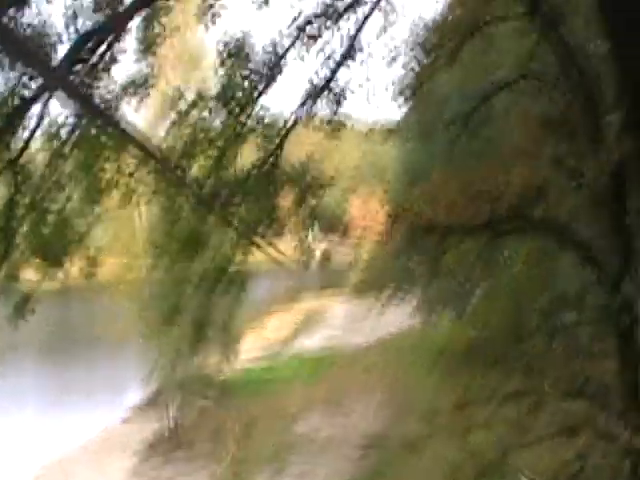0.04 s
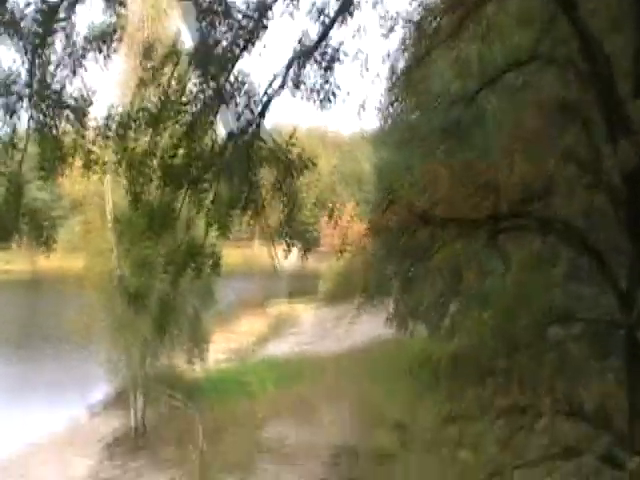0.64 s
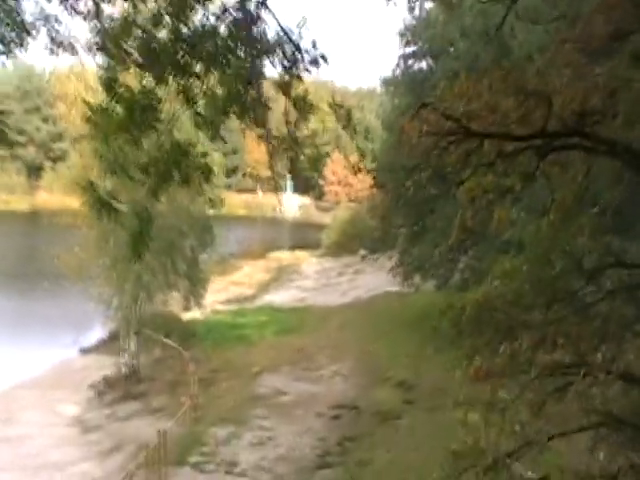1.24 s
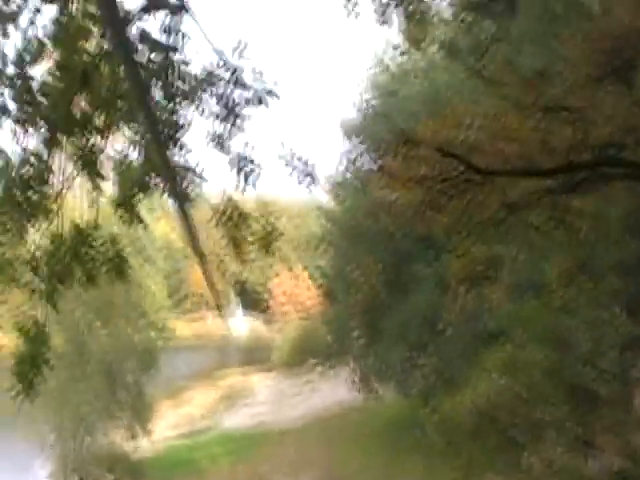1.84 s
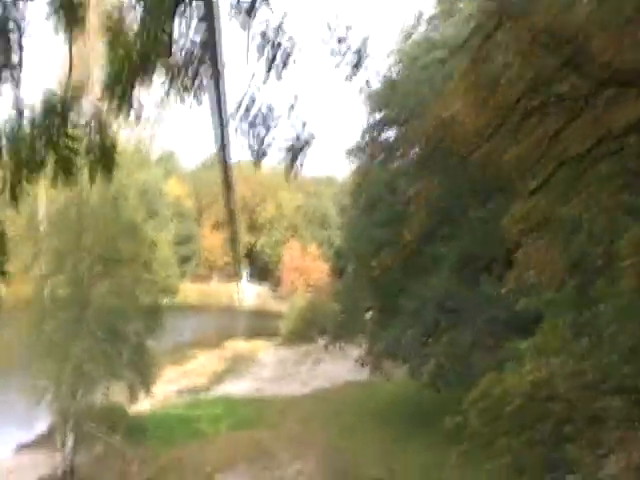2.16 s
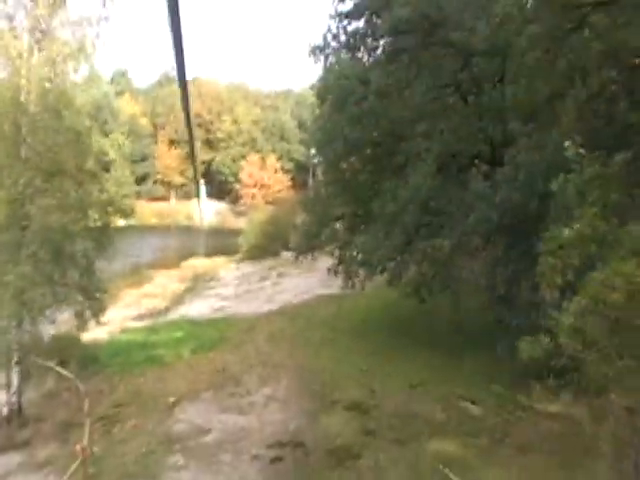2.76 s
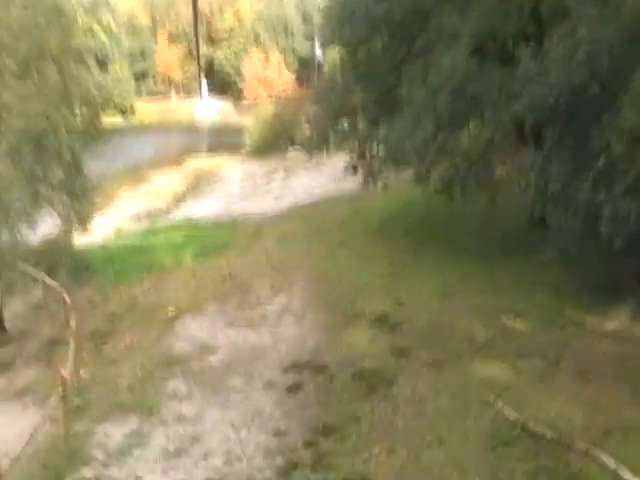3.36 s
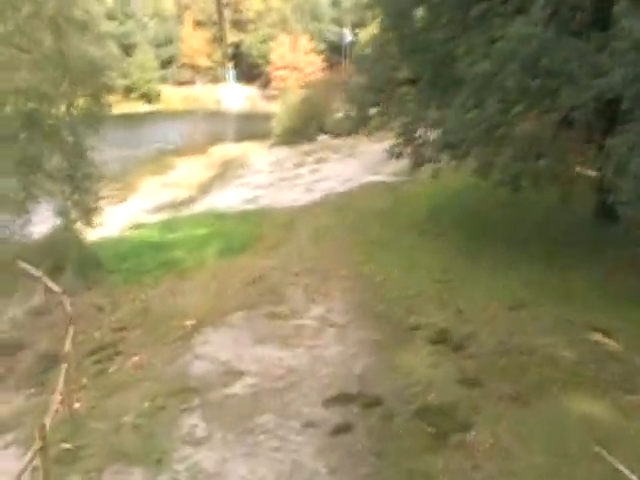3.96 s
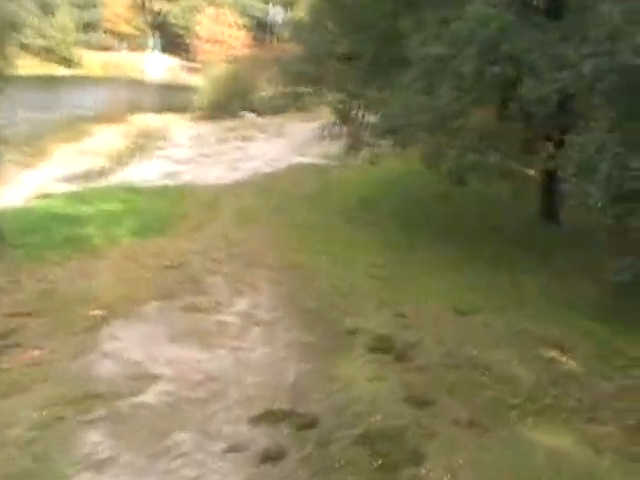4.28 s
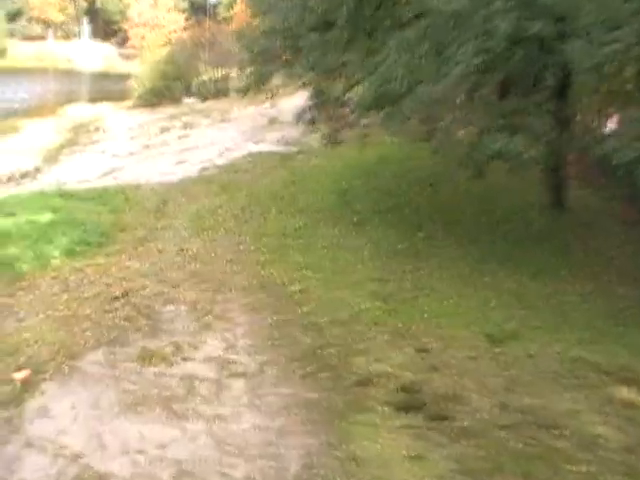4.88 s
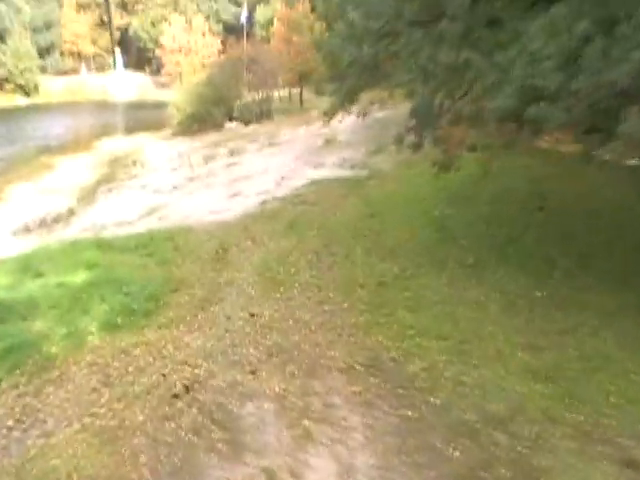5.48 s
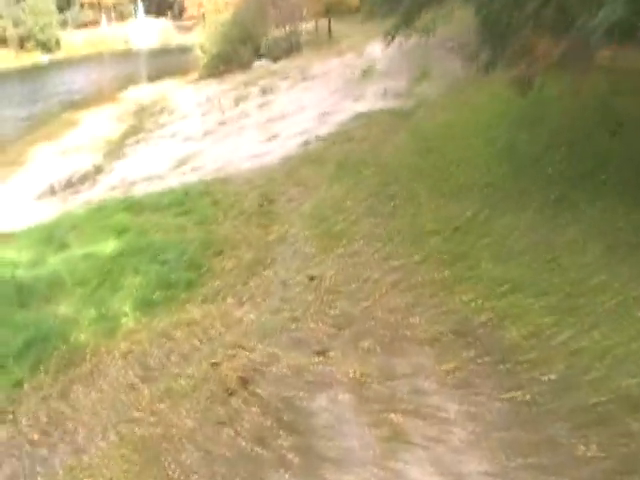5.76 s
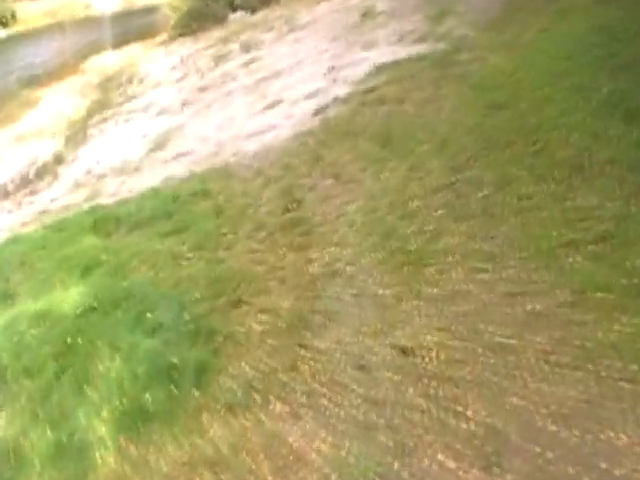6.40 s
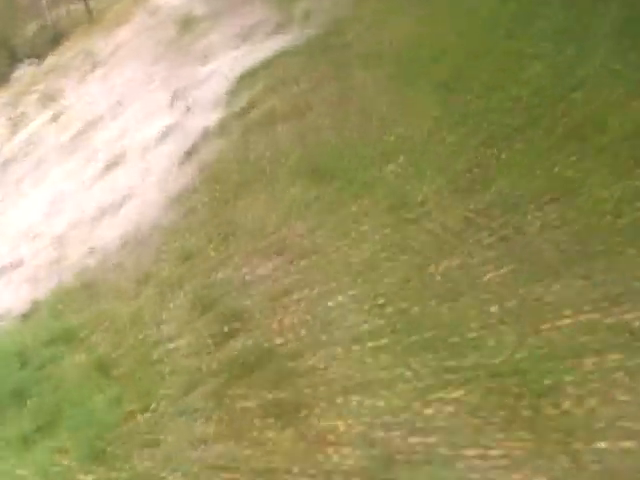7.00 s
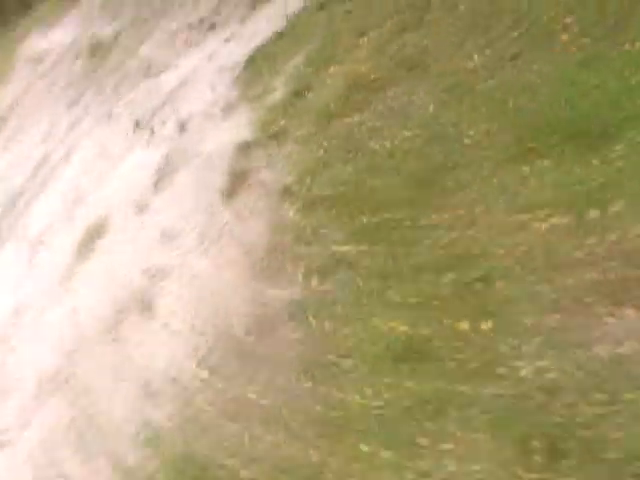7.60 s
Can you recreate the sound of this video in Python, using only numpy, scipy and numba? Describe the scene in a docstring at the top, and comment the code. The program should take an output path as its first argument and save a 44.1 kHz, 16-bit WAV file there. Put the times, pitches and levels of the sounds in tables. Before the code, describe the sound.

After a metal clank, a zip-line pulley hisses along its cable, whining higher with speed, with thin squeals, a few knocks and growing wind.

```python
"""A hanger clanks, and a zip-line trolley rolls off down a steel cable with a gritty, swelling roar.
Rough steel contact drives the trolley's resonances; the cable's strands hum under the sheaves and
ripples in the grooves whine, both rising with speed. The hanger knocks a few more times, a flange
squeals, and late in the ride the trolley slews. Rushing air buffets the microphone more and more;
it sits in a camera that the rider holds just below the trolley."""
import sys
import numpy as np
from scipy import signal
from scipy.fft import rfft, irfft, next_fast_len
from scipy.io import wavfile
from scipy.ndimage import uniform_filter1d
from numba import njit

SR = 44100
rng = np.random.default_rng(int(sys.argv[2]) if len(sys.argv) > 2 else 0)


def store_wav(level_fs):
    """Save 16-bit WAV to argv[1]."""
    pcm = np.round(np.clip(np.atleast_2d(level_fs), -1, 1) * 32767)
    wavfile.write(sys.argv[1], SR, pcm.T.astype(np.int16))


N = 341334

T = np.arange(N) / SR
STRANDS_PER_TURN = 11.66
CRUISE_HZ = 600  # reference strand rate for levels that depend on speed


def undb(db):
    """Decibels to gain."""
    return np.exp(np.asarray(db) * (np.log(10) / 20))


def unit(x):
    """Scale to rms 1."""
    return x / np.sqrt(np.mean(x ** 2))


def curve(rows, column=1):
    """One column of a table, joined by straight lines in time."""
    rows = np.array(rows, float)
    return np.interp(T, rows[:, 0], rows[:, column])


def eased(rows, seconds=0.052):
    """A curve with its corners rounded by a moving average."""
    return uniform_filter1d(curve(rows), int(seconds * SR), mode="nearest")


def spell(start, end, rise_s, fall_s):
    """Attack, hold and release, from 0 to 1."""
    return np.clip((T - start) / rise_s, 0, 1) * np.clip((end - T) / fall_s, 0, 1)


def noise():
    """White noise."""
    return rng.standard_normal(N)


def walk(rate):
    """Smooth random fluctuation of rms 1, with rate new values a second."""
    hold = max(int(SR / rate), 1)
    steps = np.repeat(rng.standard_normal(N // hold + 1), hold)[:N]
    return unit(uniform_filter1d(uniform_filter1d(steps, hold), hold))


def colour(x, points):
    """Filter by (Hz, dB) points joined on a log-frequency axis."""
    hz, db = np.transpose(points)
    size = next_fast_len(N)
    f = np.maximum(np.arange(size // 2 + 1) * SR / size, 1)
    return irfft(rfft(x, size) * undb(np.interp(np.log(f), np.log(hz), db)), size)[:N]


@njit
def svf(x, hz, width):
    """State-variable filter with a moving centre; gives band-pass and high-pass."""
    out, band_state, low_state = np.empty((2, len(x))), 0., 0.
    for i in range(len(x)):
        g, damping = np.tan(np.pi * hz[i] / SR), width[i] / hz[i]
        band = (band_state + g * (x[i] - low_state)) / (1 + g * (g + damping))
        low = low_state + g * band
        out[0, i], out[1, i] = damping * band, x[i] - damping * band - low
        band_state, low_state = 2 * band - band_state, 2 * low - low_state
    return out


def resonate(x, hz, width):
    """A steep resonance that keeps the level of white noise."""
    hz, width = hz + np.zeros(N), width + np.zeros(N)
    return svf(svf(x + 1e-18, hz, width)[0], hz, width)[0] * np.sqrt(2 * SR / np.pi / width)


def dent(x, hz, width_hz, db):
    """Peaking filter: raises or lowers one moving band."""
    return x + (undb(db) - 1) * svf(x, hz, np.full(N, float(width_hz)))[0]


def crossing(hz, centre_hz, width_hz, order=4):
    """Resonance curve: 1 at the centre, near 0 far from it."""
    return 1 / (1 + np.abs(2 * (hz - centre_hz) / width_hz) ** order)


# Blows on the hanger. Each row: start in seconds, thud in dB, clank in dB, favoured pitch in Hz.
KNOCKS = [(.002, -41, -23, 1100), (.012, -40, -24.5, 477), (.556, -46, -24, 600), (.606, -46, -31, 310),
          (.63, -44, -39, 310), (1.775, -35, -34, 400), (4.165, -41, -53, 300)]
# Its modes. Each row: frequency in Hz, time to fall 60 dB in seconds, relative level in dB.
HANGER_MODES = [(204, 0.25, -0.5), (285, 0.28, -0.5), (410, 0.16, -3), (466, 0.03, -3.5), (800, 0.08, -5),
                (955, 0.06, -1), (1160, 0.06, -3), (1410, 0.1, 2)]


def knocks(thud_s=.03, thud_hz=72., rise_s=0.0026, focus=1.96):
    """Impact excitation: the hanger shifts under load, its modes ring and a thud runs down the arm."""
    out, age = np.zeros(N + SR), np.arange(SR // 2) / SR
    for start_s, thud_db, clank_db, favoured_hz in KNOCKS:
        blow = undb(thud_db) * np.exp(-age / thud_s) * np.sin(2 * np.pi * thud_hz * age)
        for hz, t60, db in HANGER_MODES:
            share = undb(clank_db + db) / (1 + (focus * np.log2(hz / favoured_hz)) ** 2)
            blow += share * undb(-60 * age / t60) * np.sin(2 * np.pi * (hz * age + rng.random()))
        start = int(start_s * SR)
        out[start:start + len(age)] += blow * (1 - np.exp(-age / rise_s))
    return out[:N]


def contact(strand_hz, wobble_db=0.4, flutter_db=0.41, sway_db=0.12, chatter_db=2.4, chatter_s=0.0028):
    """Contact pressure throbs once a turn, flutters as the cable shakes and chatters at low speed."""
    turns = np.cumsum(strand_hz / STRANDS_PER_TURN) / SR
    bumps = (rng.random(N) < 60. / SR) * rng.uniform(0.29, 1, N)  # about 60 a second
    chatter = np.minimum(signal.lfilter([1], [1, -np.exp(-1 / (chatter_s * SR))], bumps + 1e-18), 1)
    slowness = strand_hz.min() / strand_hz
    throb_db = wobble_db * np.sin(2 * np.pi * turns) + flutter_db * walk(130) + sway_db * walk(18)
    return undb(throb_db + 2 * chatter_db * slowness * (chatter - chatter.mean()))


def grit(pressure, spread=0.18):
    """Roughness excitation: dense tiny impacts of uneven size, scaled by the pressure."""
    impacts = noise()
    return unit(impacts * (1 + spread * impacts * impacts) * pressure)


# Load on the sheaves. Each row: time in seconds, relative level in dB.
LOAD = [(0, -7), (.08, -9.5), (.2, -1), (.52, -0.8), (.57, 2), (.85, -.5), (1.08, 0.5), (1.48, 0.7),
        (1.55, -1.5), (1.85, 1.5), (2.45, -1), (3, .5), (4.9, .5), (5.3, -0.5), (5.8, .5), (7.74, -1)]


def driven(law, strand_hz, settle_start_s=0.55):
    """Forced response: a part's level in dB follows load, speed, the rider's weight and the slew."""
    # Each law: level in dB, dB per doubling of speed, dB added before the weight settles,
    # settling time in seconds, dB added at full slew.
    db, speed_db, light_db, settle_s, slew_db = law
    light = 1 - np.clip((T - settle_start_s) / settle_s, 0, 1)
    doublings = np.log2(strand_hz / CRUISE_HZ)
    return db + eased(LOAD) + speed_db * doublings + light_db * light + slew_db * slew()


# Spectra of the roar's four bands. Each row: frequency in Hz, relative density in dB.
RUMBLE_SPECTRUM = [(60, -16), (180, -10.5), (280, -5), (380, -5), (600, -6), (900, -2.5), (1300, -3),
                   (1900, 0), (2600, 0), (3600, -14.5), (6000, -47)]
RASP_SPECTRUM = [(1500, -27), (2700, -10), (3700, 0), (4400, 0), (5600, -5), (7000, -16), (10000, -58)]
HISS_SPECTRUM = [(4000, -22), (6000, -4.5), (6900, -1), (7250, -3.3), (7700, -1.2), (8200, -4), (8600, -6),
                 (9000, -12), (9500, -13), (10300, -21.5), (11500, -29.5), (13000, -40), (15500, -50)]
FIZZ_SPECTRUM = [(8000, -22), (10000, 0), (11500, 3), (13000, -9), (15500, -20)]
# Their level laws, with the entries listed in driven().
RUMBLE_LAW = (-31.4, -3.5, -1.8, .27, 2.5)
RASP_LAW = (-27.5, -3, -12.5, .3, 1)
HISS_LAW = (-26.7, 0, -8.5, .18, .5)
FIZZ_LAW = (-55, 5, -22, .35, 8.5)


def rolling(strand_hz, pressure, knee=1.984, leak_db=-11.0, leak_slope_db=-3.2, waver_db=0.44):
    """Rolling noise: a broad roar whose lower edge climbs with speed as the bumps pass faster."""
    edge_hz = knee * strand_hz
    above_edge = colour(grit(pressure), RUMBLE_SPECTRUM)
    for _ in range(2):
        above_edge = svf(above_edge, edge_hz, edge_hz)[1]
    leak_gain = undb(leak_db + leak_slope_db * np.log2(strand_hz / strand_hz.mean()))
    rumble = unit(above_edge + leak_gain * colour(grit(pressure), RUMBLE_SPECTRUM))
    rasp = unit(colour(grit(pressure), RASP_SPECTRUM)) * undb(waver_db * walk(8))
    hiss = unit(colour(grit(pressure, spread=0.16), HISS_SPECTRUM))
    fizz = unit(colour(grit(pressure, spread=1.2), FIZZ_SPECTRUM))
    bands = (rumble, RUMBLE_LAW), (rasp, RASP_LAW), (hiss, HISS_LAW), (fizz, FIZZ_LAW)
    return sum(band * undb(driven(law, strand_hz)) for band, law in bands)


def ring(mode, law_db, pressure, width_hz, contrast, wander_hz=59.6, waver_db=0.37):
    """Forced resonance: grit rings one mode, which stands out when driven hard."""
    db = law_db + curve(mode, column=2) + waver_db * walk(7)
    excess_db = np.clip(db - np.median(db), -10, 4)
    response = resonate(grit(pressure), curve(mode) + wander_hz * walk(20), width_hz)
    return response * undb(db + contrast * excess_db)


# Trolley resonances near 3, 5 and 6.4 kHz. Each row: time in seconds, centre in Hz,
# swell in dB and, for sheave and rim, width in Hz.
CHEEK = [(0, 3070, -1.5), (.8, 3060, -2), (1.4, 2890, .5), (2.2, 2910, -0.2), (2.75, 3200, 2),
         (3.2, 3150, 1), (3.45, 3160, -2.5), (3.55, 3150, 1.5), (4.1, 3160, 2.3), (4.9, 3090, 1),
         (5.3, 3080, -2), (5.8, 3040, .8), (6.8, 3070, -3), (7.74, 3110, -0.5)]
SHEAVE = [(0, 5260, -1, 1000), (1.4, 5250, .5, 900), (1.9, 4900, -1.5, 1100), (2.3, 5030, 0.5, 900),
          (2.9, 5420, -.5, 1100), (3.6, 5200, .5, 1000), (3.8, 5180, -3, 750), (4.8, 5170, -1, 650),
          (5.8, 5200, .5, 950), (6.35, 4900, 3.5, 850), (6.8, 5020, 3.5, 850), (6.96, 5750, 0, 1300),
          (7.1, 5080, 1.5, 1100), (7.48, 5020, 4.5, 750), (7.74, 5170, 2.5, 700)]
RIM = [(0, 6570, -2, 1000), (1.3, 6600, -1, 1200), (2, 6400, 0, 1000), (2.8, 6440, -.5, 1200),
       (3.35, 6350, -.5, 1000), (3.6, 6650, -2.5, 1100), (3.95, 6340, -1, 850), (4.45, 6530, .3, 950),
       (4.85, 6380, .4, 850), (5.15, 6560, 0, 850), (5.5, 6300, -1, 850), (5.78, 6520, 1, 1000),
       (6.12, 6300, 0, 650), (6.75, 6370, 0, 650), (6.98, 6800, -3, 1100), (7.36, 6480, 3, 650),
       (7.55, 6680, 1.5, 650), (7.74, 6600, -.5, 650)]
# Their level laws, with the entries listed in driven().
CHEEK_LAW = (-25.5, 0, -5, .27, -7)
SHEAVE_LAW = (-29, -.5, -7, .19, 0)
RIM_LAW = (-24.5, 2.5, -2, .12, -5.5)


def rings(strand_hz, pressure):
    """Modal superposition: the trolley's three main resonances sound together."""
    cheek = ring(CHEEK, driven(CHEEK_LAW, strand_hz), pressure, width_hz=560., contrast=.05)
    sheave = ring(SHEAVE, driven(SHEAVE_LAW, strand_hz), pressure, curve(SHEAVE, column=3), contrast=.2)
    rim = ring(RIM, driven(RIM_LAW, strand_hz), pressure, curve(RIM, column=3), contrast=.1)
    return cheek + sheave + rim


# The two highest resonances. Each row: time in seconds, centre in Hz, level in dB.
HIGH_MODE = [(0, 7700, -58), (1, 7600, -44), (2.6, 7800, -42), (3.3, 7850, -39), (3.7, 8000, -39),
             (4.4, 7730, -32), (5.4, 7620, -34.5), (5.8, 7450, -34), (6.2, 7800, -42), (6.85, 7800, -40),
             (7.3, 7650, -41), (7.74, 7400, -43)]
TOP_MODE = [(0, 8500, -65), (1.2, 8400, -47), (3.2, 8150, -45), (4.4, 8600, -36), (5.1, 8450, -47),
            (5.8, 8600, -43), (6.5, 9350, -47), (7.1, 9750, -42), (7.36, 9500, -51), (7.47, 8620, -36),
            (7.74, 8540, -36.5)]


def high_rings(pressure, width_hz=500.):
    """Forced resonance in the treble: grit drives two drifting bands that swell and fade."""
    return sum(resonate(grit(pressure), curve(mode), width_hz) * undb(curve(mode, column=2))
               for mode in (HIGH_MODE, TOP_MODE))


def shimmer(x, low_hz=3970., high_hz=10500., width_hz=470., drift_hz=160., depth_db=.9, count=7):
    """Spectral modulation: small peaks and dips drift through the treble as the camera swings."""
    for hz in np.linspace(low_hz, high_hz, count):
        x = dent(x, hz + drift_hz * walk(3.01), width_hz, depth_db * walk(5))
    return x


# Low modes of the hanger. Each row: frequency in Hz, width in Hz, relative level in dB.
DRONE_MODES = [(284.3, 34, -2), (471, 97, -1.5)]
# Their level law, with the entries listed in driven().
DRONE_LAW = (-60, -10.5, -6, .27, 2)


def drone(strand_hz):
    """Random excitation: rolling shakes the hanger's low modes, most while the bumps pass slowly."""
    modes = sum(undb(db) * resonate(noise(), hz, width) for hz, width, db in DRONE_MODES)
    return modes * undb(driven(DRONE_LAW, strand_hz))


# Hanger modes that lift the hum. Each row: centre in Hz, width in Hz, lift in dB.
HUM_SWELLS = [(402, 44, 9), (497, 55, 7), (668, 80, 6.5), (838, 80, 13), (844, 28, 3), (890, 32, 6.5)]


def hum(strand_hz, level_db=-58, waver_db=1.5, drift_hz=1.53, upper_db=-10., lower_db=3.):
    """Periodic forcing: passing strands make a tone, and the oval sheave adds two sidebands."""
    cycles = np.cumsum(strand_hz + drift_hz * walk(20)) / SR
    upper_ratio, lower_ratio = 1 + 2 / STRANDS_PER_TURN, 1 - 3 / STRANDS_PER_TURN
    upper = undb(upper_db + 2 * walk(3.7)) * np.sin(2 * np.pi * cycles * upper_ratio)
    lower = undb(level_db + lower_db + 2 * walk(12)) * np.sin(2 * np.pi * cycles * lower_ratio)
    lower *= crossing(lower_ratio * strand_hz, centre_hz=495., width_hz=70.)  # heard only in this mode
    swell_db = sum(db * crossing(strand_hz, hz, width, order=20) for hz, width, db in HUM_SWELLS)
    tone = unit(np.sin(2 * np.pi * cycles) + upper)
    return tone * undb(level_db + swell_db + waver_db * walk(12)) + lower


# Shaking of the rider's hand. Each row: time in seconds, level in dB.
HAND_SHAKE = [(0, -58), (1.7, -53.5), (3.4, -63), (4.4, -53), (7.74, -51.5)]


def handling(hz=62.3, width_hz=52.0, shake_db=3.):
    """Structure-borne sound: the cable's shaking reaches the camera through the hand as a rumble."""
    return resonate(noise(), hz, width_hz) * undb(curve(HAND_SHAKE) + shake_db * walk(14))


def rush(strand_hz, cruise_db=-57.5, db_per_doubling=40.5):
    """Power law of flow noise: its amplitude grows steeply with speed."""
    return undb(cruise_db + db_per_doubling * np.log2(strand_hz / CRUISE_HZ))


# Spectrum of the buffeting. Each row: frequency in Hz, relative density in dB.
WIND_SPECTRUM = [(20, -22), (40, -11), (65, -3), (110, 2), (170, -1.5), (250, -8.5), (400, -21), (800, -33),
                 (2000, -57)]


def eddies(brightness, bright_hz=330., width_hz=390.):
    """Turbulence: deep noise, with a higher band mixed in by brightness."""
    return unit(colour(noise(), WIND_SPECTRUM)) + brightness * resonate(noise(), bright_hz, width_hz)


# Single gusts. Each row: time of the peak in seconds, length in seconds, level in dB.
GUSTS = [(.01, .08, -35), (0.678, 0.21, -38.5), (1.4, 0.13, -39), (1.8, 0.14, -34), (2.3, 0.22, -48),
         (2.66, .1, -41), (4.5, .3, -48), (5.05, 0.53, -36.5), (5.65, 0.67, -33.5), (6.65, .15, -37),
         (6.997, 0.32, -28.5), (7.328, .14, -31)]


def wind(strand_hz, breeze_db=-58.5, gust_db=3., common_db=-10., lean_db=1.5, bright_db=-6.):
    """Turbulent pressure: eddies mostly push one microphone port while they pull the other."""
    gusts = sum(undb(db) * np.exp(-(2 * (T - s) / length) ** 2) for s, length, db in GUSTS)
    air = np.sqrt(undb(breeze_db) ** 2 + rush(strand_hz) ** 2 + gusts ** 2)
    force = air * undb(gust_db * walk(30))
    brightness = undb(bright_db) * air / air.max()  # strong gusts reach higher
    common = undb(common_db) * force * eddies(brightness)
    opposed = force * eddies(brightness)
    return np.array([(common + opposed) * undb(lean_db / 2), (common - opposed) * undb(-lean_db / 2)])


RIPPLE_ORDERS = np.arange(22, 35)  # counts of ripples round the groove
# Strength of the ripples, rolling and skidding. Each entry: one order's relative level in dB at speed.
ROLLING_RIPPLE_DB = [-14.5, -17, -17.5, -14, -8, -6, -5.5, 1.2, 1.5, -.5, -11, -8, -11]
SKID_RIPPLE_DB = [-17, -15, -9, -9, -8, -1, -.5, -1, 0, 1, -9, -4.5, -10]
# Loudness of the whine and of its overtone. Each row: time in seconds, level in dB.
WHINE_LEVEL = [(.1, -44), (.19, -35), (.6, -35), (1.05, -33.5), (1.42, -33.5), (1.49, -48), (1.7, -50),
               (1.8, -33.5), (2.3, -31), (2.9, -27), (3.5, -28), (4.1, -31.5), (4.8, -31), (5.45, -29.7),
               (5.85, -31.5), (6.1, -33), (6.45, -34), (6.95, -28.5), (7.2, -25.5), (7.35, -29.5),
               (7.5, -35), (7.74, -37.5)]
OVERTONE_LEVEL = [(0, -47), (1.3, -40), (1.6, -30.5), (2.1, -27.5), (2.6, -31.5), (5.7, -33), (6.4, -26.5),
                  (6.9, -38), (7.74, -33)]
# Creep of the sheave against the cable. Each row: time in seconds, rise in pitch in per cent.
CREEP = [(0, 1), (.2, 2), (.45, -.8), (.75, 2), (.92, -1.5), (1.4, .5), (1.75, .3), (1.95, 2.3),
         (2.25, 2.5), (2.45, .9), (2.9, 1.3), (3.2, .8), (4.7, .8), (5.4, .1), (6.2, .6), (7.05, .3),
         (7.2, -.4), (7.35, .3), (7.6, .8)]
# Sheave resonances that lift each passing line. Each row: centre in Hz, width in Hz, lift in dB.
WHINE_SWELLS = [(410, 40, 2.5), (680, 50, 3), (875, 50, 3.5), (1074, 70, 2.5), (1294, 86, 2.5),
                (1420, 52, 2.5), (1665, 120, 2.5), (1927, 66, 2.5), (2023, 77, 2.5), (2350, 130, 7)]


def whine(turn_hz, pressure, slip_hz=5., skid_slip_hz=3.5, waver_db=2.3, smear_db=-12.5, overtone=5.33):
    """Corrugation noise: groove ripples give spectral lines one turn rate apart, blurred by slip."""
    spin_hz = turn_hz * (1 + eased(CREEP) / 100)
    turns = np.cumsum(spin_hz) / SR
    skidding = spell(start=2.0, end=3.95, rise_s=0.6, fall_s=0.6)
    slowness = np.maximum(turn_hz.mean() / turn_hz, 1)  # a slow sheave runs true: weak outer lines
    lines, hop = 0, 100
    for order, rolling_db, skid_db in zip(RIPPLE_ORDERS, ROLLING_RIPPLE_DB, SKID_RIPPLE_DB):
        db = (rolling_db + (skid_db - rolling_db) * skidding) * slowness
        slip = np.cumsum((slip_hz + skid_slip_hz * skidding) * walk(40)) / SR
        line = np.sin(2 * np.pi * (order * turns + slip + rng.random()))
        line_hz = order * spin_hz[::hop]
        swell_db = sum(lift * crossing(line_hz, hz, width) for hz, width, lift in WHINE_SWELLS)
        lines += undb(db + np.repeat(swell_db, hop)[:N] + waver_db * walk(14)) * line
    centre_hz = spin_hz * np.average(RIPPLE_ORDERS, weights=undb(ROLLING_RIPPLE_DB) ** 4)
    judder_db = 2.3 * np.log2(slowness)  # at low speed the tone gives way to skidding noise
    lines = unit(lines) * undb(-judder_db - .5 * skidding)
    smear = resonate(grit(pressure), centre_hz, 0.18 * centre_hz)
    smear *= undb(smear_db + judder_db + 2.5 * skidding)
    upper_hz = overtone * STRANDS_PER_TURN * turn_hz
    upper = resonate(grit(pressure), upper_hz, 0.22 * upper_hz)
    return (lines + smear) * undb(curve(WHINE_LEVEL)) + upper * undb(curve(OVERTONE_LEVEL))


# A flange brushes the cable and squeals in spells; near 5.9 s a further short narrow tone rings at about 2 kHz,
# played alike. Each row: start and end # in seconds, pitch and width in Hz, level in dB.
SQUEALS = [(.18, .7, 3010, 220, -35), (.55, .61, 3070, 200, -28), (1.0, 1.5, 2930, 200, -35),
           (1.45, 1.72, 1830, 110, -38), (2.82, 3.0, 3240, 200, -32), (3.2, 3.47, 2580, 180, -34),
           (3.474, 3.72, 3250, 80, -24.5), (3.63, 4.4, 3170, 190, -30), (4.4, 5.15, 3080, 190, -34),
           (5.68, 6.05, 2990, 170, -29.5), (5.82, 5.93, 2062, 50, -32), (6.88, 7.17, 2450, 190, -30.5)]


def squeals(strand_hz, rise_s=0.008, fall_s=0.046, throb_db=1.8, rough_db=1.6):
    """Friction-excited vibration: one mode sings in an unsteady tone that throbs once a turn; the short narrow
    tone near 5.9 s is played the same way."""
    out = np.zeros(N)
    throb = throb_db * np.sin(2 * np.pi * np.cumsum(strand_hz / STRANDS_PER_TURN) / SR)
    for start, end, hz, width, db in SQUEALS:
        tone = np.sin(2 * np.pi * np.cumsum(hz + width / 2 * walk(400)) / SR)
        rough_tone = unit(tone * undb(throb + rough_db * walk(250)))
        out += undb(db) * spell(start, end, rise_s, fall_s) * rough_tone
    return out


# Rough spots on the cable. Each row: time in seconds, jump in pressure in dB.
SNAGS = [(.3308, 5), (.3617, 2.5), (.487, 2.5), (.5555, 3), (.7079, 4.5), (1.0397, 4.5)]


def snags(decay_s=.006):
    """Impulsive loading: each rough spot lifts the contact pressure, which relaxes exponentially."""
    kicks = np.zeros(N)
    for s, db in SNAGS:
        kicks[int(s * SR)] = undb(db) - 1
    return 1 + signal.lfilter([1], [1, -np.exp(-1 / (decay_s * SR))], kicks)


def lurch(pressure, start_s=.543, length_s=.066, from_hz=750, to_hz=978, scrape_db=-27, crunch_db=-28):
    """Sliding friction: as the weight comes on, the sheave skids with a rising scrape and a crunch."""
    end_s = start_s + length_s
    hz = curve([(start_s, from_hz), (end_s, to_hz)]) + 35. * walk(200)
    scrape = unit(np.sin(2 * np.pi * np.cumsum(hz) / SR)) * undb(scrape_db + 2.5 * walk(199))
    crunch = resonate(grit(pressure), hz=1200., width=1200.) * undb(crunch_db)
    return (scrape + crunch) * spell(start_s, end_s, rise_s=.014, fall_s=.035)


def sweep(strand_hz, pressure, multiple=10.6, base_db=-50., swell_db=21.7):
    """Swept excitation: a noise band climbs with speed and swells in the trolley's upper resonances."""
    hz = multiple * strand_hz
    db = base_db + swell_db * crossing(hz, centre_hz=5950., width_hz=3600.)
    return resonate(grit(pressure), hz, width=500.) * undb(db)


# A hollow in the roar's spectrum. Each row: time in seconds, centre in Hz, gain in dB.
HOLLOW = [(3, 4250, -0.5), (3.3, 4400, -3), (3.55, 4500, 1), (3.85, 4650, -5), (4.4, 4700, -5),
          (5.45, 4570, -4), (5.9, 4200, -3), (6.8, 4000, -1), (6.97, 5050, -2), (7.08, 4630, 0),
          (7.25, 4450, -11), (7.43, 4250, -16), (7.54, 3850, -13), (7.74, 3700, -10)]
# Its companions. Each row: ratio to its centre, width in Hz, share of its gain, dB added at full slew.
SIDE_HOLLOWS = [(.535, 300, 0.2, 4), (.635, 340, 0, -11)]


def hollow(x, width_hz=400.0):
    """Phasing: notches glide together through the roar and change depth while the trolley slews."""
    hz, db, slewed = eased(HOLLOW), curve(HOLLOW, column=2), slew()
    for ratio, width, share, slew_db in SIDE_HOLLOWS:
        x = dent(x, ratio * hz, width, share * db + slew_db * slewed)
    return dent(x, hz, width_hz, db)


# Gaps between the treble resonances. Each row: time in seconds, centre in Hz, gain in dB.
LOW_GAP = [(3.4, 5800, 0), (4.3, 5700, -1.5), (5.7, 5700, 0), (6, 5500, -3), (6.7, 5700, -2), (7, 5750, 0),
           (7.5, 5800, -3.5)]
HIGH_GAP = [(3.5, 8200, 0), (5.2, 8350, -3.5), (5.8, 8300, -1), (6.05, 8900, -4), (6.5, 8700, -1),
            (7.25, 8650, -5), (7.43, 8080, -13), (7.6, 8200, -6), (7.74, 7950, -11)]


def gaps(x, width_hz=420.):
    """Notch filtering: two narrow gaps slide through the treble as the camera swings."""
    for gap in (LOW_GAP, HIGH_GAP):
        x = dent(x, curve(gap), width_hz, curve(gap, column=2))
    return x


def slipstream(strand_hz, hz=1710.0, width_hz=1700.0, gain_db=-4., waver_db=1.):
    """Flow noise: air hisses past the rider, louder with speed."""
    return resonate(noise(), hz, width_hz) * rush(strand_hz) * undb(gain_db + waver_db * walk(6))


def slew():
    """Flange contact: how far the trolley has slewed onto a flange, from 0 to 1."""
    return spell(start=6.84, end=7.95, rise_s=.12, fall_s=1.0)


def roar(strand_hz, pressure):
    """Source and filter: rolling noise and the trolley's resonances pass through the moving notches."""
    modes, top = rings(strand_hz, pressure), high_rings(pressure)
    body = modes + sweep(strand_hz, pressure) + rolling(strand_hz, pressure)
    return shimmer(gaps(hollow(body) + top))


# Speed of the ride. Each row: time in seconds, rate at which strands pass under a sheave in Hz.
STRAND_RATE = [(0, 146), (.2, 154), (.5, 188), (1, 262), (1.4, 338), (1.8, 386), (2, 418), (3, 552),
               (3.5, 613), (4, 668), (5, 763), (6.3, 856), (6.85, 872), (7.05, 900), (7.4, 904),
               (7.74, 890)]
# Stereo width of the roar. Each row: frequency in Hz, side minus mid in dB.
STEREO_WIDTH = [(100, -10), (700, -11), (1300, -10.5), (2400, -19), (4400, -16), (6300, -15), (7500, -9.5),
                (9000, -1.5), (15000, -3)]
# Balance of the two microphones. Each row: frequency in Hz, left minus right in dB.
BALANCE = [(400, 1), (1300, 1), (2400, .5), (5500, 0.7), (10000, 0), (15000, -3)]


def scene():
    """Superposition: the trolley hangs overhead; its treble scatters off the rider and arrives wide."""
    strand_hz = eased(STRAND_RATE, seconds=0.12)
    pressure = contact(strand_hz) * snags()
    tones = whine(strand_hz / STRANDS_PER_TURN, pressure) + hum(strand_hz) + squeals(strand_hz)
    trolley = roar(strand_hz, pressure) + tones + drone(strand_hz) + knocks() + lurch(pressure)
    mid = trolley + handling() + slipstream(strand_hz)
    side = colour(roar(strand_hz, pressure), STEREO_WIDTH)
    left = colour(mid + side, [(hz, db / 2) for hz, db in BALANCE])
    right = colour(mid - side, [(hz, -db / 2) for hz, db in BALANCE])
    return np.array([left, right]) + wind(strand_hz)


def record(dry, port_hz=8250.0, port_width_hz=1420.0, port_depth=0.63, top_hz=15700):
    """Frequency response: the left microphone port notches the treble, and the camera cuts the top."""
    port_band = svf(dry[0], np.full(N, port_hz), np.full(N, port_width_hz))[0]
    ears = np.array([dry[0] - port_depth * port_band, dry[1]])
    return signal.sosfilt(signal.ellip(8, .2, 70, top_hz, fs=SR, output="sos"), ears)


dry = scene()
out = record(dry)
store_wav(out)
```